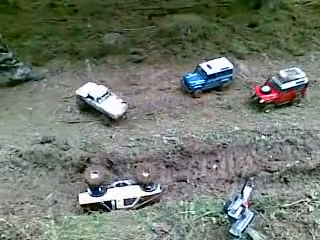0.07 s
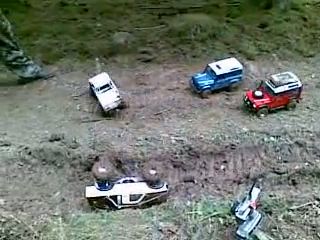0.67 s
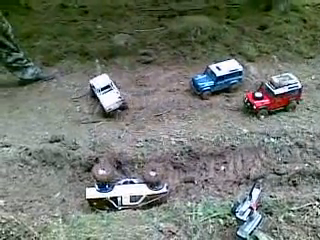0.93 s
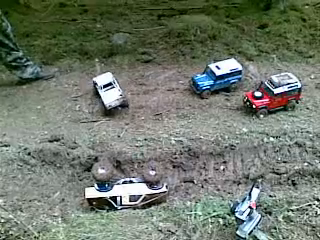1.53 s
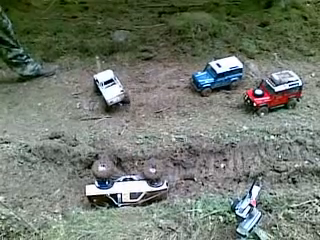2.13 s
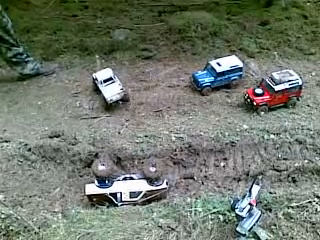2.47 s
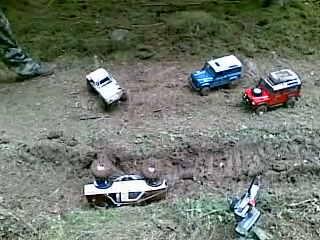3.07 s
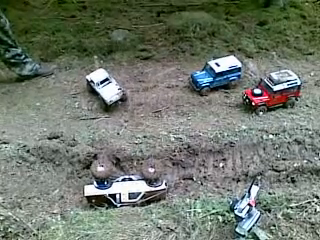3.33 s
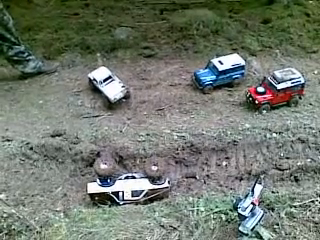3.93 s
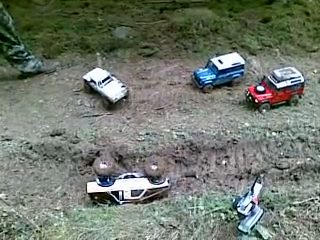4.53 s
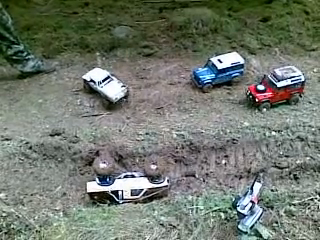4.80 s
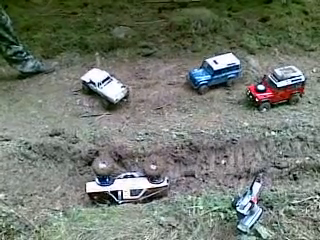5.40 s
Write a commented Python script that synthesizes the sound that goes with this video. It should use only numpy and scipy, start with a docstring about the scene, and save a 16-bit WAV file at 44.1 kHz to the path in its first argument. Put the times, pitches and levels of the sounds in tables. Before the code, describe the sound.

From the start, a model truck's small electric winch hauls outdoors with a throbbing, rattling gear whine, the main sound throughout. Its pitch rises, sags around 0.6 seconds, then climbs again and levels off at about 1.3 seconds, pulsing two to three times a second. Dull, soft tyre scuffs on soil sit beneath it during the first second. A thin, high bearing squeal appears at the start, from 1 to 1.6 seconds, and again from 3.6 seconds. At about 4.3 seconds the motor cuts and the gears run down almost at once. The chassis gives a few light ticks between 4.4 and 5.2 seconds. Quiet outdoor hiss gradually lifts, with a thin, quickly pulsing electronic tone. From about 5.1 seconds a distant model truck whirrs faintly upward, a servo barely sings, and a quick run of faint, distant peeps comes around 5.5 seconds.

```python
"""A throbbing, rattling gear whine picks up speed, holds, then runs down: a model truck's small electric
winch hauling on a line outdoors. The meshing teeth sing through the housing, a tight spot in every turn
of the drum makes the throb, a dry bearing squeals and the tyres scuff the soil.
Afterwards the chassis ticks, and the camera's gain recovers and lifts the outdoor hiss,
a thin controller tone, a faint servo, distant whirring and chirps."""
import sys
import numpy as np
from scipy import signal
from scipy.fft import rfft, irfft
from scipy.io import wavfile
from scipy.ndimage import uniform_filter1d

SR = 44100
rng = np.random.default_rng(int(sys.argv[2]) if len(sys.argv) > 2 else 0)


def pcm_store(signal):
    """Save signal as 16-bit PCM."""
    levels = np.round(np.clip(np.atleast_2d(signal), -1, 1) * 32767)
    wavfile.write(sys.argv[1], SR, levels.astype(np.int16).T)


N = 250047
TIME = np.arange(N) / SR
PINION_TEETH, TEETH_PER_DRUM_TURN = 8, 112
FAINT_EDGE_S = .021  # fade in and out of the servo and the distant truck

# the teeth bite as the line takes up: t/s, whine/dB, lift of meshing harmonics 2 and 3/dB, rattle/dB
TOOTH_BITE = [(0, -2.5, 2, 0.5), (.22, -2.5, 2.5, 1), (.34, 0.5, 1, -0.5), (.76, 0.5, 1, 0.5),
              (.88, 1, 4, 0.5), (1.1, 1, 3.5, -.5), (1.25, 0.5, 1.5, 2)]


def undb(db):
    """Decibels to gain."""
    return 10 ** (np.asarray(db) / 20)


def unit(x):
    """Scale to rms 1."""
    return x / np.sqrt(np.mean(x ** 2))


def curve(rows, column=1):
    """One column of a table, joined by straight lines in time."""
    rows = np.array(rows)
    return np.interp(TIME, rows[:, 0], rows[:, column])


def swells(rows, rise_s, fall_s):
    """Envelope of (t/s, length/s, level/dB) events that rise, hold and fall."""
    return sum(undb(db) * np.clip(.5 + np.minimum((TIME - s) / rise_s, (s + length - TIME) / fall_s), 0, 1)
               for s, length, db in rows)


def phase_of(hz):
    """Running phase in radians of a changing frequency."""
    return 2 * np.pi * np.cumsum(hz) / SR


def colour(x, points):
    """Equalise along (f/Hz, level/dB) points."""
    hz, db = np.transpose(points)
    f = np.maximum(np.fft.rfftfreq(N, 1 / SR), 1)
    return irfft(rfft(x) * undb(np.interp(np.log(f), np.log(hz), db)), N)


def ring(x, hz, width_hz):
    """One resonance, gain 1 at its centre."""
    return signal.lfilter(*signal.iirpeak(hz, hz / width_hz, fs=SR), x)


def noise():
    """White noise."""
    return rng.standard_normal(N)


def walk(rate_hz):
    """Smooth random drift, rms 1."""
    return unit(signal.sosfilt(signal.butter(2, rate_hz, fs=SR, output="sos"), noise()))


def outdoors():
    """A bed of gently wavering air, with a light breeze and soft puffs rumbling on the microphone."""
    # tone of the air: f/Hz, level/dB
    air_colour = [(20, -13.5), (50, -1), (110, -7.5), (180, -9), (330, -4.5), (500, -7.5), (900, -10),
                  (1600, -13), (2400, -17.5), (4100, -16.5), (5100, -20.5), (7500, -18.5), (15500, -19.5)]
    # puffs of wind: t/s, length/s, level/dB
    puffs = [(.2, 0.099, -51), (.34, 0.13, -44.5), (1.28, 0.38, -59), (1.89, 0.11, -51), (2.22, 0.07, -57)]
    air = unit(colour(noise(), air_colour)) * undb(-55.5 + .5 * walk(4))
    wind = unit(colour(noise(), [(12, 13), (35, 20.5), (70, 17.5), (130, -9), (500, -21), (3000, -77)]))
    return air + wind * (undb(-74) + swells(puffs, rise_s=.05, fall_s=.05))


def distant_truck():
    """A truck creeps further off: its gears whirr upward as it gathers speed, over a humming body."""
    # the creep: t/s, length/s, level/dB
    creep = [(5.13, .7, -66)]
    mesh_hz = 1280 + 560 * np.maximum(TIME - creep[0][0], 0)
    gears = np.sin(phase_of(mesh_hz * (1 + .026 * walk(114) + .037 * walk(3.8)))) * undb(3 * walk(69))
    hum = unit(ring(ring(noise(), 940, 130), 920, 135))
    return (unit(gears) + undb(-2) * hum) * swells(creep, FAINT_EDGE_S, FAINT_EDGE_S)


def chirps():
    """A quick run of distant, hoarse peeps on one pitch, each with a weak echo from the bank."""
    # peeps: t/s, level/dB
    peeps = [(5.376, -61), (5.415, -58), (5.466, -59), (5.523, -59), (5.573, -60), (5.617, -58),
             (5.657, -63)]
    half_length_s, echo_s, echo_db = .005, .019, -7
    gate = sum(undb(db + path_db) * np.exp(-((TIME - s - lag_s) / half_length_s) ** 2)
               for s, db in peeps for lag_s, path_db in ((0, 0), (echo_s, echo_db)))
    return np.sqrt(2) * gate * np.sin(phase_of(2630 + 130 * walk(400)))


def servo():
    """A steering servo sings faintly once, in three wavering lines; the lowest swells."""
    # the servo's move: t/s, length/s, level/dB
    move = [(5.255, 0.257, -71)]
    # its lines: f/Hz, relative starting level/dB, waver/Hz, growth/(dB/s)
    lines = [(964, 1, 39.8, 33), (1890, 3, 2.7, 2), (5600, 0.5, 8, 0)]
    age_s = TIME - move[0][0]
    song = 0
    for hz, db, waver_hz, growth in lines:
        gain = undb(db + growth * age_s + 2 * walk(29))
        song += gain * np.sin(phase_of(hz + waver_hz * walk(38.4)))
    return np.sqrt(2) * song * swells(move, FAINT_EDGE_S, FAINT_EDGE_S)


def controller():
    """The speed controller's thin switching tone and its octave, pulsing quickly."""
    # the tone swells and fades: t/s, level/dB
    levels = [(4.45, -70), (4.62, -69), (4.67, -65), (4.95, -64.5), (5.0, -74), (5.12, -73), (5.2, -70),
              (5.4, -67), (5.46, -74), (5.56, -74), (5.61, -68)]
    pulse_hz, crest_s = 20, 4.721
    switching = phase_of(1998 + 3 * walk(32))
    pulse = np.cos(2 * np.pi * pulse_hz * (TIME - crest_s))
    pulse_db = 5.5 * np.tanh(2.5 * pulse + .6) + .6 * walk(25)
    tone = (np.sin(switching) + undb(-12) * np.sin(2 * switching)) * undb(pulse_db)
    return unit(tone) * undb(curve(levels))


def tyres():
    """Soft rubber drags over the soil in short, dull bursts."""
    # scuffs and bumps: t/s, level/dB, f/Hz, decay/s
    scuffs = [(0.063, -52, 159, 0.034), (0.13, -47, 187, 0.049), (0.215, -40.5, 360, 0.069),
              (0.323, -47.5, 330, 0.041), (0.717, -45, 290, 0.012)]
    out = 0
    for s, db, hz, decay_s in scuffs:
        age = np.maximum(TIME - s, 0) / decay_s
        burst = unit(ring(ring(noise(), hz, .96 * hz), hz, .6 * hz))
        out += undb(db) * burst * (1 - np.exp(-8 * age)) * np.exp(-age)
    return out


def ground(x):
    """Soil and the bank behind scatter a short, weak echo."""
    t = np.arange(SR // 10) / SR
    tail_s, predelay_s = .08, .002
    scatter = rng.standard_normal(len(t)) * undb(-60 * t / tail_s) * (t > predelay_s)
    return x + undb(-12) * signal.fftconvolve(x, scatter / np.linalg.norm(scatter))[:N]


def chassis(x, ring_db):
    """The chassis rings along with whatever shakes it."""
    # sharp resonances: f/Hz, width/Hz, relative level/dB
    modes = [(1353, 51, 7.5), (1490, 256, 7.5), (1677, 52, 9.5), (1850, 224, 3), (2310, 210, -3),
             (2854, 78, 2.5), (3423, 150, 7), (3870, 35, -2), (9775, 224, 5.5)]
    return x + sum(undb(db + ring_db) * ring(x, hz, width) for hz, width, db in modes)


def settling():
    """Small knocks ring the chassis as it settles after the pull."""
    # knocks: t/s, level/dB
    ticks = [(4.41, -45), (4.42, -51), (4.646, -59.5), (5.146, -62)]
    decay_s = .0029
    knocks = sum(undb(db) * (TIME >= s) * np.exp(-np.abs(TIME - s) / decay_s) for s, db in ticks)
    return chassis(knocks * unit(ring(noise(), 1800, 1400)), ring_db=2)


def drum_load(mesh_hz):
    """Once a drum turn a tight spot presses the teeth, then drags the motor; at times the gears bind."""
    # the gears bind extra hard: t/s, strength/ordinary tight spots
    hard_spots = [(0.316, 0.48), (0.397, 1.137), (0.909, 0.82), (1.026, 0.96), (1.168, 0.33), (1.205, 0.23),
                  (1.253, 0.92), (1.301, 0.35), (1.464, 0.23), (1.503, 0.64), (1.62, 0.64), (1.664, 0.2),
                  (1.773, 0.52), (1.823, 0.88), (2.033, 0.44), (2.139, 1.44), (2.342, 0.4), (2.5, 1.062),
                  (2.862, 0.63), (3.022, 0.93), (3.226, 0.59), (3.387, 0.53), (3.592, 0.55), (3.753, 0.53),
                  (3.917, 0.44), (4.079, 0.83)]
    first_tight_turn, lead_turns, lean_rad = .26, .079, .35
    angle = phase_of(mesh_hz) / TEETH_PER_DRUM_TURN - 2 * np.pi * first_tight_turn + .2 * walk(25)
    depth = 1.15 + .1 * walk(12)  # no two turns are alike
    ahead = angle + 2 * np.pi * lead_turns
    leaning = ahead - lean_rad * np.cos(ahead)
    tight, drag = (np.tanh(1.2 * np.cos(a) - .15) * depth for a in (leaning, angle))
    rise_s, slip_s = .008, .0035  # a bind builds slowly and slips quickly
    binds = sum(strength * np.exp(-.5 * ((TIME - s) / np.where(TIME < s, rise_s, slip_s)) ** 2)
                for s, strength in hard_spots)
    return tight, drag, binds


def gear_noise(contact, hz, width_hz):
    """Tooth-by-tooth scraping through one resonance, rms 1."""
    return unit(ring(ring(noise() * contact, hz, width_hz), hz, width_hz))


def dry_bearing(contact):
    """The dry bearing squeals in a high band that swells in and cuts off."""
    # squeals: t/s, length/s, level/dB
    squeals = [(.03, 0.51, -39), (1.0, 0.6, -36), (3.6, 0.786, -39.5), (4.02, 0.37, -39.5)]
    return gear_noise(contact, hz=7260, width_hz=850) * swells(squeals, rise_s=.089, fall_s=.0099)


def tooth_rattle(contact, shaft, pace, unloaded):
    """Teeth scrape brightly; slow, slack gears also knock on the cover once a shaft turn."""
    # tone of the scrape: f/Hz, level/dB
    scrape_colour = [(60, -16), (125, -16.5), (170, -7.5), (240, -18.5), (480, -25), (800, -9), (1100, -13),
                     (1600, -6), (2100, 2), (2750, -2), (3300, -4.5), (4200, -3), (4700, -4), (5250, -8.5),
                     (6100, 0), (7400, 6), (8700, -3), (9800, 0), (12500, -15), (15500, -26.5)]
    scrape = unit(chassis(colour(noise() * contact, scrape_colour), ring_db=-15))
    knocks = np.exp(1.1 * np.cos(shaft + walk(49)))
    chatter = gear_noise(contact * knocks, hz=2850, width_hz=650)
    return scrape + chatter * (1 - pace) * undb(-2 + 4.5 * unloaded)  # harder while coasting


def tooth_whine(shaft, press, binds, pace, unloaded):
    """Partials of the shaft and its gears: pressure flares some and ducks others; bouncing teeth rasp."""
    # tooth meshing at 8, 16, ...; commutator at 6, 12; an off-centre pinion at 1, 7, 9:
    # f/shaft rate, level/dB, change under pressure/dB, change in a bind/dB, rasp/share
    partials = [(1, -22.5, 3.5, 8.5, 0.3), (4, -21.5, 1.5, -12, 0.84), (6, -22, -38, -2, 0.73),
                (7, -15, -32, 1, 0.6), (8, 1, 1.5, 6, 0.28), (9, -13, 10.5, -23, 0.7),
                (12, -18, -46, -12, 0.8), (16, -9.5, 8, 6.5, 0.54), (24, -8.5, 2, 5, 0.52),
                (32, -10, 3.5, 2, 0.45), (40, -11.5, 11, 8, 0.53), (48, -11, 0, 12, 0.1),
                (56, -9, 2, 10, 0.3)]
    # response of the gear housing: f/Hz, level/dB
    housing = [(250, -4.5), (470, -7), (600, 5.5), (950, -7), (1250, -3.5), (1950, -2), (2130, -0.5),
               (2300, -0.5), (2550, 0), (2850, 2), (3400, -0.5), (3750, 2.5), (4050, 4.5), (4450, 3),
               (4950, -1.5), (5350, -1), (5950, 6), (7400, 9), (8700, 4), (9900, -2.5), (11200, -1.5),
               (15500, -29)]
    rasp_hz, coast_rasp, shake_db = 203, .25, 2.5
    out = 0
    for multiple, db, press_db, bind_db, rasp in partials:
        phase = multiple * shaft + rng.uniform(0, 2 * np.pi)
        harmonic = multiple / PINION_TEETH
        # at low speed the main tone is clean, while backlash smears the other partials
        looseness = pace ** 3 if harmonic == 1 else pace ** -.2
        share = np.clip(rasp * looseness + coast_rasp * unloaded, 0, 1)
        rough = (walk(rasp_hz) * np.cos(phase) + walk(rasp_hz) * np.sin(phase)) / np.sqrt(2)
        partial = np.sqrt(1 - share) * np.cos(phase) + np.sqrt(share) * rough
        bite_db = curve(TOOTH_BITE, column=2) * (harmonic in (2, 3))
        load_db = bite_db + press_db * press + bind_db * binds
        lost_db = 9 * unloaded * (harmonic > 1)  # without drive the overtones drop
        out += partial * undb(db + load_db + shake_db * walk(50) - lost_db)
    return chassis(colour(out, housing), ring_db=-.5)


def winch():
    """Meshing teeth whine and rattle; load slows the motor and presses them harder, until it coasts."""
    # tooth-meshing rate under power: t/s, f/Hz
    speed = [(0, 950), (.06, 1200), (.32, 1512), (.45, 1438), (.58, 1220), (.78, 1306), (.88, 1619),
             (1.02, 1587), (1.12, 1880), (1.23, 1960), (1.31, 2116), (2.1, 2168), (4.32, 2094)]
    # effort of the winch, the base level of the rattle: t/s, level/dB
    effort = [(0, -39.5), (0.08, -34.5), (0.29, -30), (0.55, -35.5), (0.78, -36.5), (0.92, -30),
              (1.25, -30.5), (1.6, -33), (2.9, -34), (4.3, -33.5)]
    power_cut_s, coast_s, unload_s, fade_s = 4.325, .135, .025, .105
    stall_hz, stall_span_hz = 720, 90  # friction stalls the gears at this meshing rate
    easing_db_per_s, grit_db = 1.48, 1.5

    coasted_s = np.maximum(TIME - power_cut_s, 0)
    unloaded = np.minimum(coasted_s / unload_s, 1)
    fade = (coasted_s / fade_s) ** 3.5  # the slackening teeth fall quiet
    whine_fade_db, rattle_fade_db = 11 * fade, 42 * fade
    mesh_hz = curve(speed) * np.maximum(1 - coasted_s / coast_s, .1)
    pace = mesh_hz / mesh_hz.max()

    # the tight spot presses harder with effort and speed, and eases as the line winds on
    effort_db = curve(effort)
    tight, drag, binds = drum_load(mesh_hz)
    strain_db = .7 * (effort_db - effort_db.mean()) - easing_db_per_s * TIME
    press = 1.34 * np.clip(tight, 0, 1.1) ** 2 * pace * undb(strain_db)
    slack = np.maximum(drag - tight, 0) * pace  # just past the tight spot
    sag = .073 * drag * pace ** .2 * (1 - unloaded) + .015 * binds
    flutter = 1 + .007 * walk(150)
    tooth = phase_of(mesh_hz * (1 - sag) * flutter) + .08 * walk(700)  # no two teeth are alike
    shaft = tooth / PINION_TEETH

    stutter_db = 2.5 * unloaded * walk(77)  # without drive the teeth catch unevenly
    whine_db = -34 + 5.5 * np.log2(pace) + .28 * strain_db - 5 * slack + curve(TOOTH_BITE)
    whine = tooth_whine(shaft, press, binds, pace, unloaded) * undb(whine_db + stutter_db - whine_fade_db)
    turning = np.clip((mesh_hz - stall_hz) / stall_span_hz, 0, 1)

    # each tooth contact scrapes, in uneven, gritty bursts
    contact = np.exp(.7 * np.cos(tooth)) * undb(1.7 * walk(400) + 1.2 * walk(16) + grit_db * walk(2500))
    rattle_db = effort_db + curve(TOOTH_BITE, column=3) - 2 * slack + .21 * press + .5 * binds
    rattle = tooth_rattle(contact, shaft, pace, unloaded) * undb(rattle_db - rattle_fade_db)
    squeal = dry_bearing(contact)
    body_shake = gear_noise(contact, hz=338, width_hz=210) * undb(-59.5 - rattle_fade_db)
    return whine * turning + rattle + squeal + body_shake


def scene():
    """The truck and its surroundings, mixed in mono."""
    truck = ground(winch() + settling()) + tyres() + controller() + servo()
    return (truck + distant_truck() + chirps() + outdoors())[None]


def record(dry):
    """The camera ducks loud sound at once, lets its gain creep back, and cuts the top."""
    quiet_gain_db, threshold_db, ratio = 10.5, -49.5, 1.925
    detector_s, recovery_db_per_s, top_hz = .043, 11, 15650
    power = uniform_filter1d(dry ** 2, int(detector_s * SR))
    cut_db = np.maximum(10 * np.log10(power) - threshold_db, 0) * (1 - 1 / ratio)
    recovered_db = recovery_db_per_s * TIME
    held_db = np.maximum.accumulate(cut_db + recovered_db, axis=-1) - recovered_db
    low_pass = signal.ellip(10, .2, 80, top_hz, fs=SR, output="sos")
    return signal.sosfilt(low_pass, dry * undb(quiet_gain_db - held_db))


dry = scene()
out = record(dry)
pcm_store(out)
```